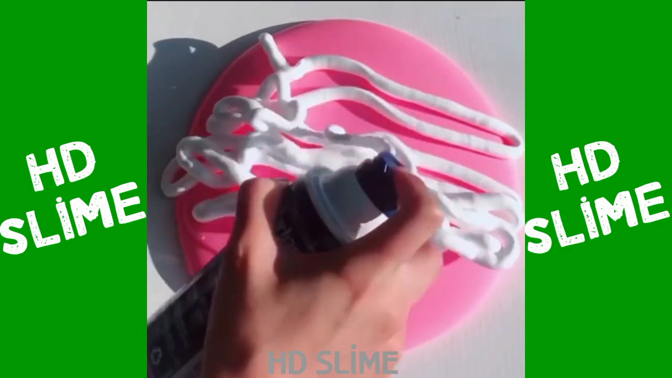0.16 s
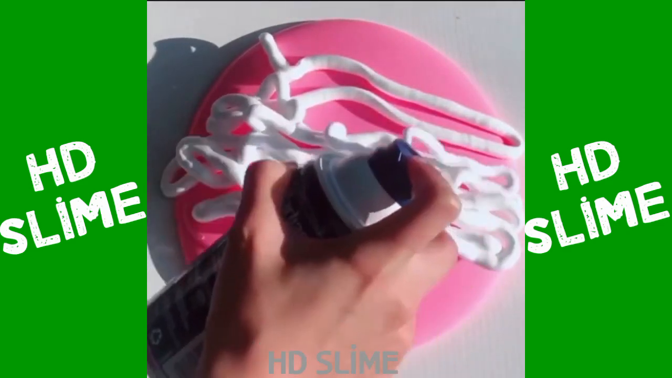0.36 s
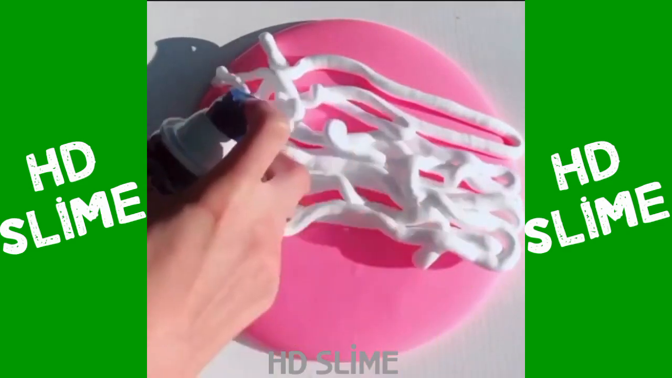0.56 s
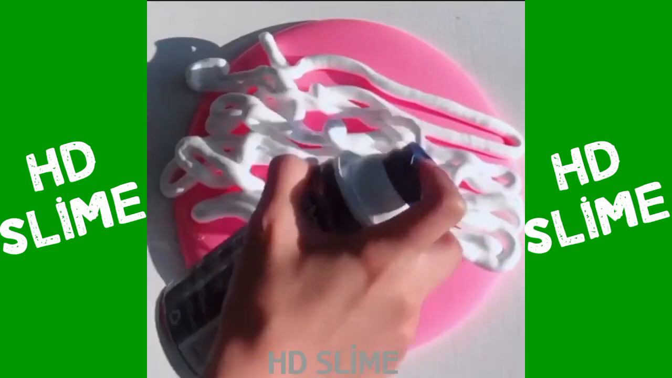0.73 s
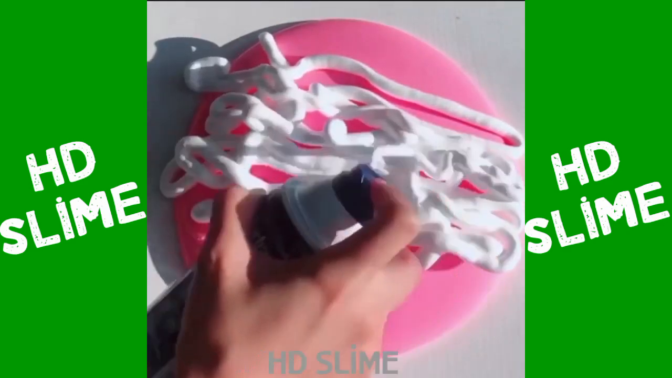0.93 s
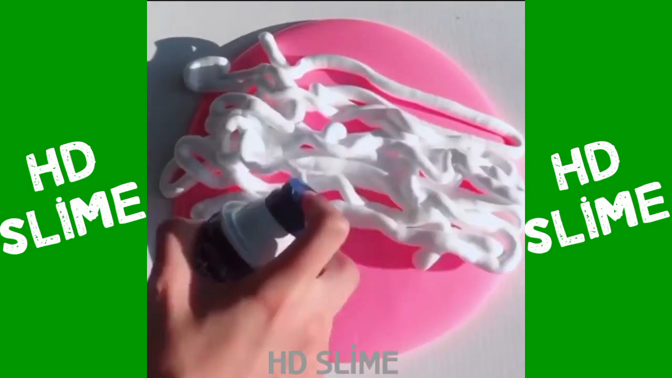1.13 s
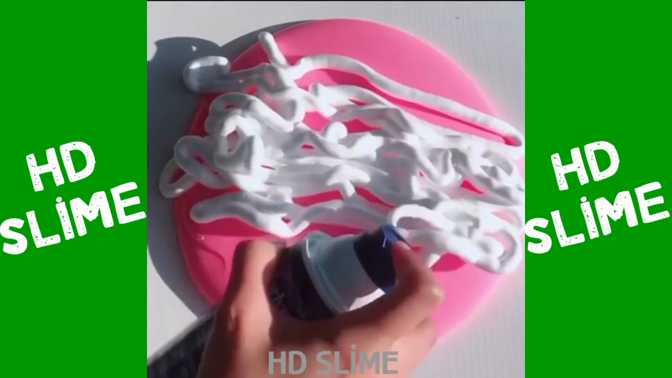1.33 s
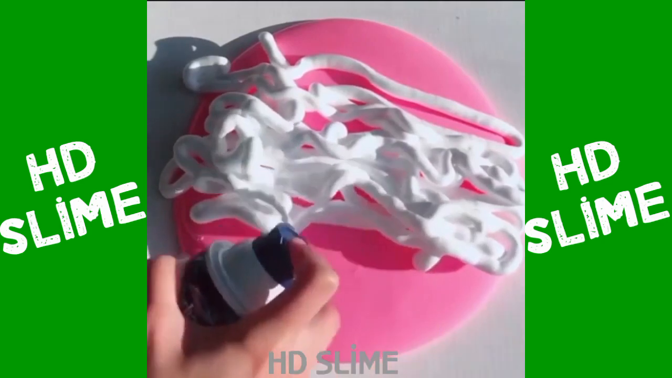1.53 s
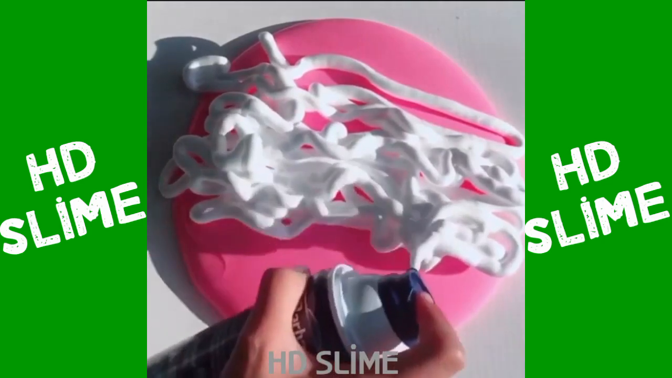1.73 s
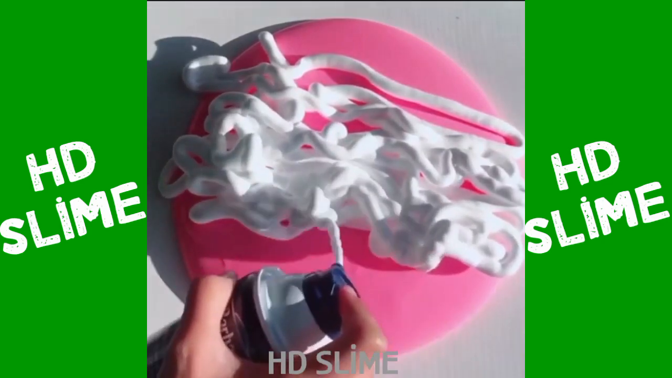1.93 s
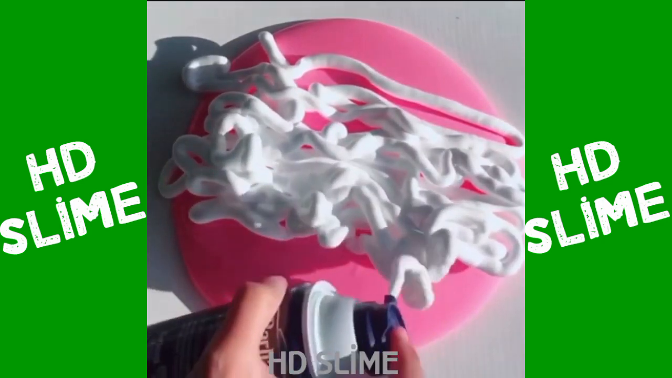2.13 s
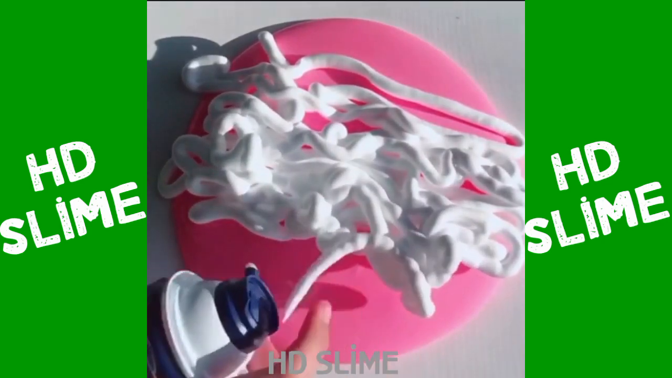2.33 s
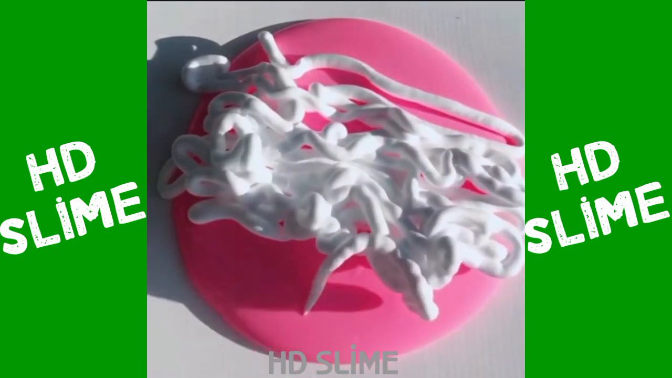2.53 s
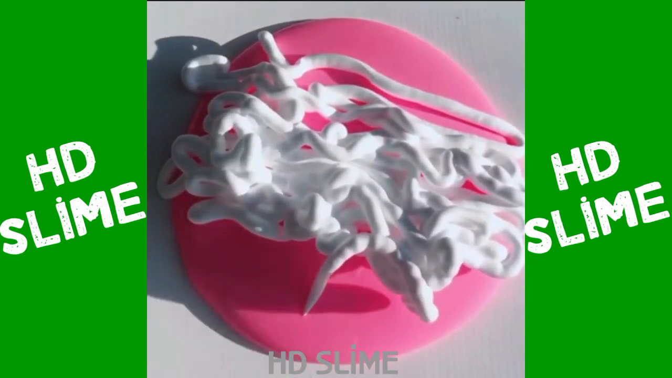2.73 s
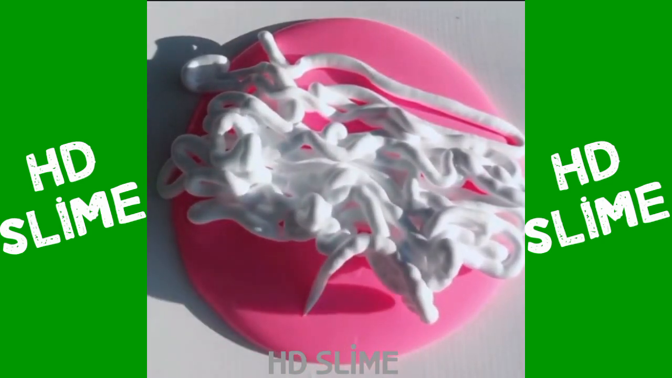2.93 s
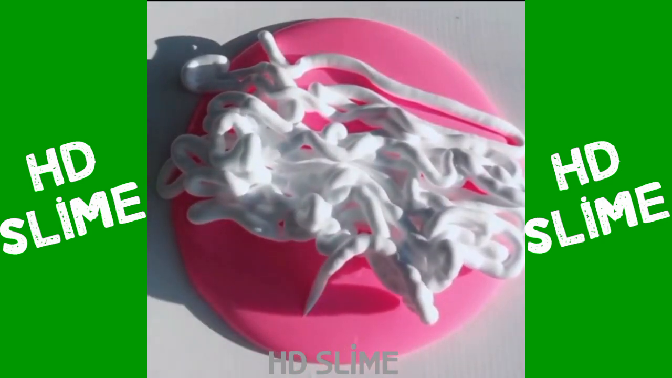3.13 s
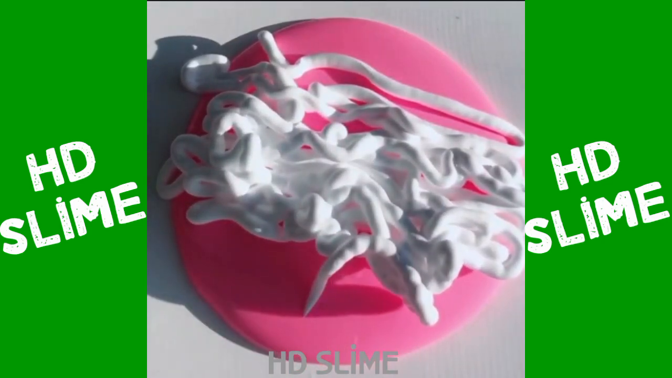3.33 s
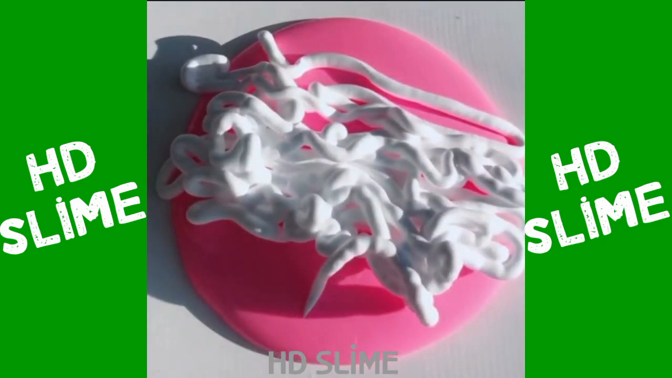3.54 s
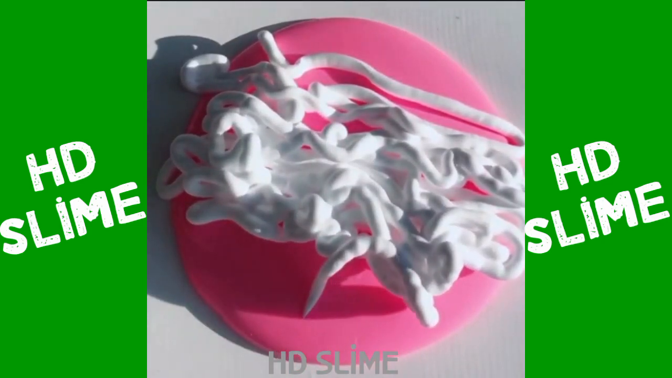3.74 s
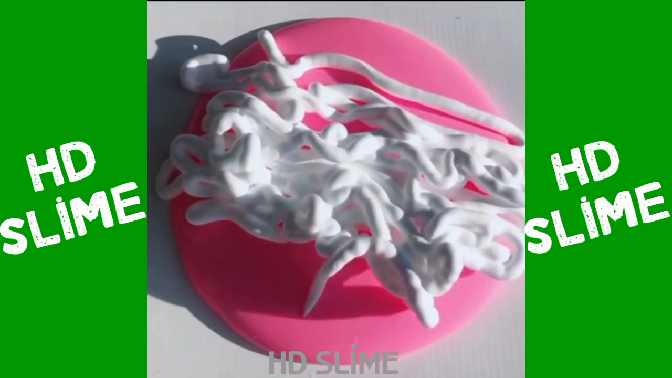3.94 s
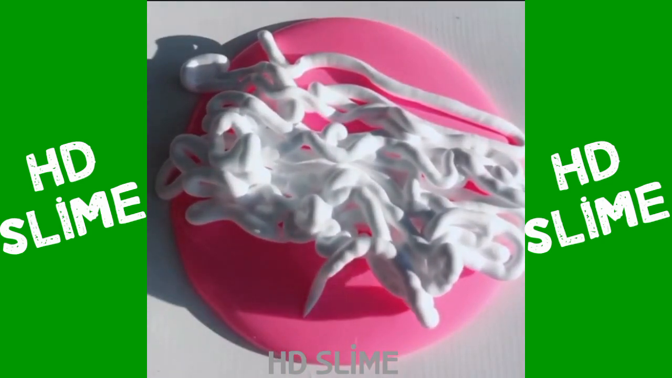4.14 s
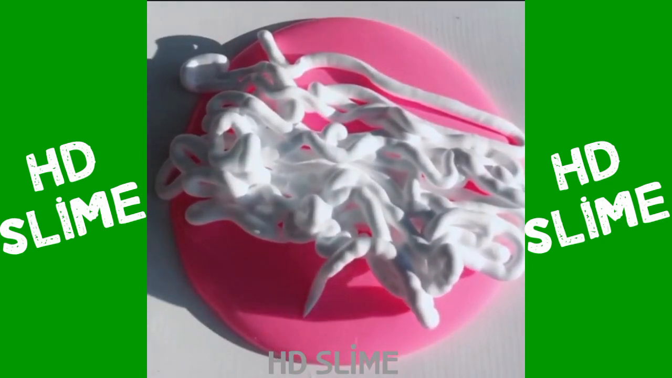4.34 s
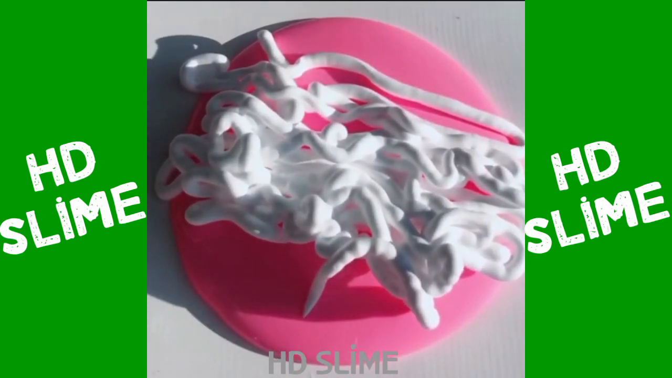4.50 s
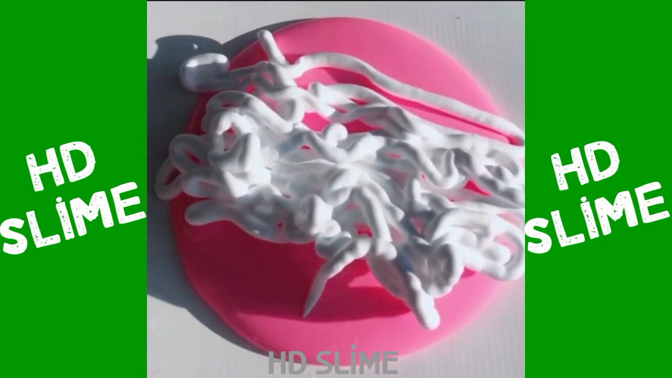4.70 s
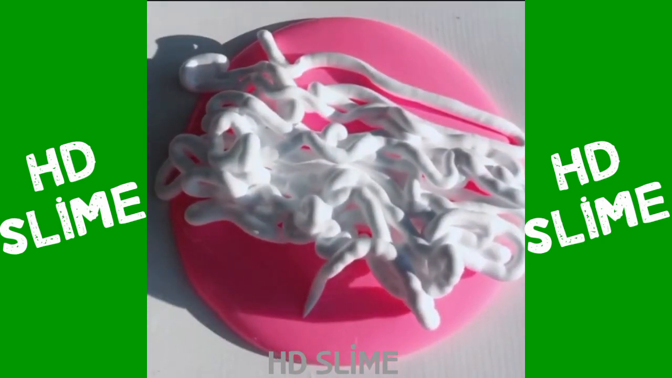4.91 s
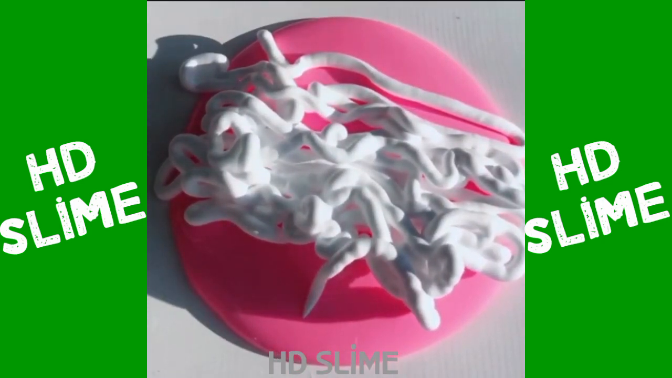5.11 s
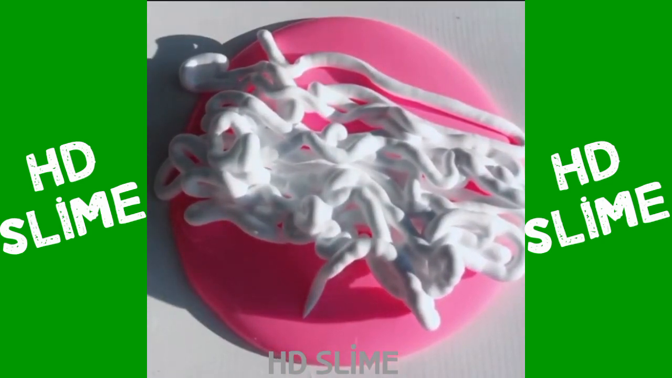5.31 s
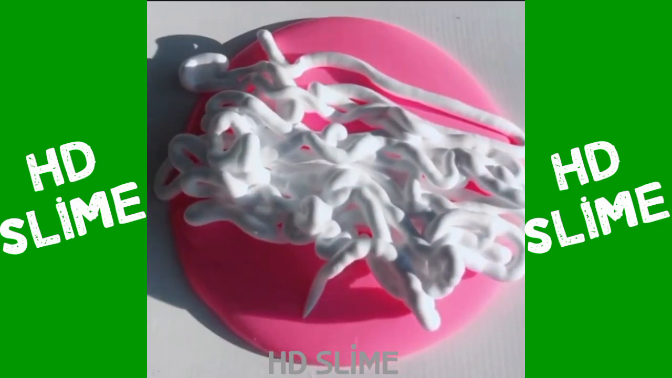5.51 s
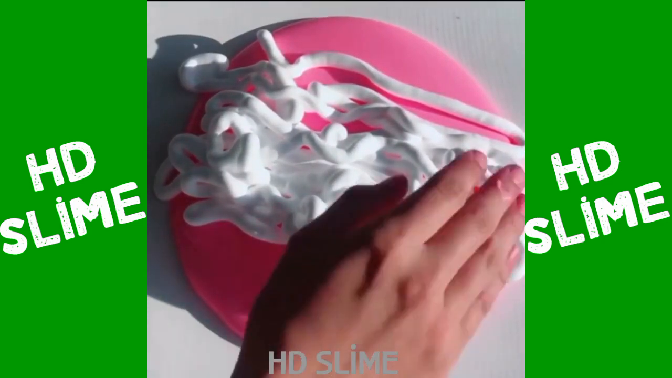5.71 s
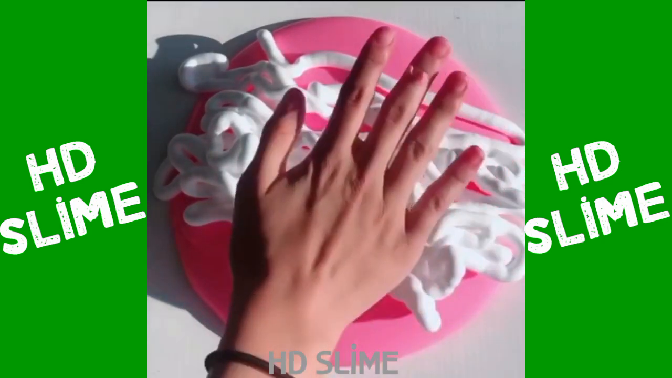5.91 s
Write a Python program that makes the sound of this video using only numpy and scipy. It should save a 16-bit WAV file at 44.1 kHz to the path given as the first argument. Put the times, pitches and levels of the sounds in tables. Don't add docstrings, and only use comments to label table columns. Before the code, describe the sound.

The sound begins mid-spray, close to the microphone: pressurised gas and foam rush from an aerosol nozzle in a bright hiss, with a breathy, unsteady whistle around 2.5 kHz and a thinner one near 4 kHz. Short sputters swell it at the start, near 0.5 s, from 1.1 to 1.7 s and just before 2.1 s, when the nozzle clogs and the higher whistle dulls. At about 2.2 s the spray stops sharply, with a tiny bleed of gas. Quiet follows: faint foam fizz and crackle, swelling slightly near 2.9 s, over soft room hiss and a slowly receding distant rumble. At 4.15 s the can knocks a wooden table, brushes it lightly, then lands at 4.43 s with the loudest low, woody thump, rim click and short dull room tail. A barely audible touch comes at 4.75 s. Fizz rises around 5.4 s, with a clear tick at 5.3 s and fainter ones until 6 s.

```python
import sys
import numpy as np
from scipy import signal
from scipy.fft import rfft, irfft, next_fast_len
from scipy.io import wavfile
from scipy.ndimage import uniform_filter1d, map_coordinates

SR = 44100
rng = np.random.default_rng(int(sys.argv[2]) if len(sys.argv) > 2 else 0)


def invert_db(x):
    u = np.asarray(x, float) / 20
    return 10 ** u


def generate_wav(signal):
    frames = np.transpose(np.atleast_2d(signal))
    scaled = np.clip(frames, -1, 1) * 32767
    pcm = np.round(scaled).astype(np.int16)
    wavfile.write(sys.argv[1], SR, pcm)


N = 262816

# [t/s, gas flow level/dB, clogging 0-1]
VALVE_CURVE = [
    (0, -47, .35),
    (.3, -48, 0.11),
    (.6, -46.5, 0.02),
    (.85, -47, 0.19),
    (1.15, -46, 0.07),
    (1.35, -47, 0.23),
    (1.58, -46.5, 0.13),
    (1.85, -46.5, .55),
    (2.0, -44.5, 0.78),
    (2.16, -46, .99),
]
# [t/s, rise level/dB]
SPURTS = [(.04, 9.5), (.09, 10), (.33, 0), (.51, 4), (1.06, 11.5), (1.2, 8.5), (1.51, 7.5), (1.57, 5),
          (1.65, 8), (1.99, 7), (2.07, 9.5), (2.135, 9.5)]
# [f/Hz, density level/dB per Hz]
JET_SPECTRUM = [(1000, -27), (1700, -14), (2540, 4.5), (2890, -11), (4150, -0.5), (4880, -7.5),
                (7050, -8.5), (7910, -12), (11200, -9), (12000, -18), (15600, -50), (22000, -120)]
# [f/Hz, width f/Hz, level/dB]
HIGH_CAVITY = [(4134, 360, 1.5), (4433, 240, -2.5), (3490, 290, -9), (3237, 750, -3)]
# [f/Hz, width f/Hz, level/dB]
HEAD = [(7130, 350, -1.5), (8800, 1150, -2.5), (11650, 480, 3.5)]
# [t/s, low modes level/dB, high modes level/dB, pitch factor under the hand's load, damping factor]
TOUCHES = [
    (4.1504, -24.5, -35.5, 1.036, 1.6),
    (4.255, -38.5, -62, 1.03, 1.5),
    (4.299, -37.5, -43, 1.03, 1.55),
    (4.314, -27.5, -72, 1.08, 1.63),
    (4.4252, -15.5, -26.5, 1.001, 0.96),
    (4.75, -40.5, -52, 0.86, 1.27),
]
# [f/Hz, level/dB, t60 t/s]
LOW_MODES = [(102.3, -7, 0.23), (126.7, -11.5, 0.26), (171.2, 12, 0.15), (206, -10, 0.32), (295, 2.5, 0.14)]
HIGH_MODES = [(350, 11, 0.048), (457, -26, .07), (599, -3.5, 0.078), (840, -23, 0.025), (815, 4, 0.024),
              (1158, -11, 0.042), (1370, -7, 0.033), (1460, -21, 0.034), (2040, -13, 0.011),
              (2410, -20, .02)]
# [t/s, peak level/dB]
TICKS = [
    (5.2838, -40),
    (5.303, -56),
    (4.689, -50),
    (5.918, -50),
    (5.715, -53),
    (3.36, -54),
]
# [t/s, rise level/dB]
SWELLS = [
    (2.2, 3),
    (2.9, 5.5),
    (4.62, 0.5),
    (5.41, 7.5),
]
# [f/Hz, density level/dB per Hz]
RUMBLE_SPECTRUM = [(15, -52), (25, -8.5), (39, -11), (64, -1), (98, -11.5), (119, -5.5), (188, -15.5),
                   (260, -19.5), (340, -55), (570, -120)]
# [f/Hz, width f/Hz, level/dB]
DRONES = [(56, 23.5, -56.5), (75.6, 12, -51)]
# [f/Hz, density level/dB per Hz]
HISS_SPECTRUM = [(130, -45), (220, -13.5), (273, -3.5), (334, -1.5), (452, -10.5), (734, -7), (943, -10.5),
                 (1120, -10.5), (1610, -15.5), (4110, -18.5), (4860, -20.5), (11400, -29.5), (12000, -49),
                 (15600, -63), (22000, -120)]

SHUT_S = 2.163


def spray():
    flow_db, low_db, high_db, low_hz = nozzle()
    t = np.minimum(np.arange(N) / SR, SHUT_S)

    jet = coloured(JET_SPECTRUM, patchy_db=2.5, rate=11, octaves=.06)
    ringing = 0
    for hz, width_hz, db in HEAD:
        flicker = invert_db(300 / width_hz * 2.7 * drift(3.1))
        ringing = ringing + invert_db(db) * resonance(jet, hz, width_hz) * flicker
    jet = jet + ringing

    body = whistle(low_hz + 30, 500) * invert_db(2.3 * drift(18))
    shoulder = invert_db(-8.5 + 2.5 * t) * whistle(2120, 140) * invert_db(2.1 * drift(4.0))
    core = invert_db(-2) * whistle(low_hz + 45 * drift(7), 93) * invert_db(1.5 * drift(26))
    low = filtered(body + shoulder + core, 6, 1960, "high")

    high = 0
    for hz, width_hz, db in HIGH_CAVITY:
        sagging_hz = hz * (1.025 - .025 * t) + 70 * drift(4.4)
        high = high + invert_db(db + 2.7 * drift(25)) * whistle(sagging_hz, width_hz)
    return invert_db(flow_db + 3.5) * rms_one(jet) + invert_db(low_db - 2.0) * rms_one(low) + invert_db(high_db + 1.0) * rms_one(high)


def nozzle():
    flow_db, clog = in_time(VALVE_CURVE)
    since_shut = np.maximum(np.arange(N) / SR - SHUT_S, 0)
    spurt_db = bumps(SPURTS, rise_s=0.021, fall_s=0.027)
    low_db = flow_db + 1.04 + 0.5 * clog + spurt_db - 450 * since_shut
    leak_db = -15 - 300 * since_shut
    flow_db = flow_db + np.maximum(-1002 * since_shut, leak_db)
    high_db = flow_db + 3 - 21 * clog
    low_hz = 2534 - 120 * clog + 8.5 * spurt_db
    return flow_db, low_db, high_db, low_hz


def thumps(travel=0.0744, low_build_s=0.022, high_build_s=0.0025):
    out, t = np.zeros(N), np.arange(SR // 2) / SR
    main_hz = LOW_MODES[2][0]
    for s, low_db, high_db, pitch, damping in TOUCHES:
        side_db = -0.4 * max(low_db - high_db - 11.5, 0)
        at = round(s * SR)
        for modes, level_db, build_s in (LOW_MODES, low_db, low_build_s), (HIGH_MODES, high_db, high_build_s):
            for k, (hz, db, t60) in enumerate(modes):
                late = np.maximum(t - travel / np.sqrt(hz) + 0.00231, 0)
                swell = 1 - np.exp(-late / build_s)
                spot_db = side_db * (hz < 800 and hz != main_hz)
                wave = swell * np.sin(2 * np.pi * hz * pitch * late) * (-1) ** k
                out[at:at + len(t)] += invert_db(level_db + db + spot_db - 60 * damping * late / t60) * wave
    return out


def cracks():
    t60, swell_s = .03, .002
    t, envelope, clicks = np.arange(SR // 8) / SR, np.zeros(N), np.zeros(N)
    for s, low_db, high_db, *_ in TOUCHES:
        at = round(s * SR)
        swell = 1 - np.exp(-(t / swell_s) ** 2)
        envelope[at:at + len(t)] += invert_db(high_db - 4 - 60 * t / t60) * swell
        clicks[round((s + swell_s) * SR)] = invert_db(high_db + 24)
    return filtered(clicks + envelope * 4 * rng.standard_normal(N), 4, (750, 1700), "band")


def echo_tail():
    t60, swell_s, below_db = .45, .015, 15
    t, envelope = np.arange(SR // 2) / SR, np.zeros(N)
    for s, low_db, high_db, pitch, damping in TOUCHES:
        at = round(s * SR)
        decay = invert_db(high_db - below_db - 60 * damping ** 2 * t / t60)
        envelope[at:at + len(t)] += decay * (1 - np.exp(-t / swell_s))
    dull = filtered(rng.standard_normal(N), 2, [290, 1300], "band")
    return envelope * invert_db(3.0 * drift(30)) * rms_one(dull)


def foam():
    fizz_db = -69 + bumps(SWELLS, rise_s=0.27, fall_s=0.27)
    burst = np.zeros(N)
    for s, db in TICKS:
        burst[round(s * SR)] = invert_db(db)
    born = rng.random(N) < 40 * invert_db(5 * drift(4)) / SR
    burst += born * invert_db(fizz_db + 4.0 + 3.2 * np.minimum(rng.exponential(1, N), 3))

    r = np.exp(-1 / (.0005 * SR))
    puffs = signal.lfilter([1], [1, -r], burst + 1e-18) * rng.standard_normal(N)
    puffs = filtered(puffs, 5, 3500, "high")
    pop = invert_db(0.5) * resonance(np.roll(burst, round(.0009 * SR)) * 10, 3900, 700)
    fizz = filtered(rng.standard_normal(N), 2, 7500, "high")
    fizz = invert_db(fizz_db + 3.5 + 3.2 * drift(5.4)) * fizz
    return pop + puffs + 1.1 * resonance(puffs, 10000, 3100) + fizz


def distant_rumble():
    level_db = -48 - 0.53 * (np.arange(N) - N / 2) / SR
    rumble = invert_db(level_db) * coloured(RUMBLE_SPECTRUM, patchy_db=1.5, rate=4.8, octaves=0.575)
    drones = sum(invert_db(db) * whistle(hz, width_hz) for hz, width_hz, db in DRONES)
    return filtered(rumble + drones, 4, 35, "high")


def room_hiss():
    level_db = -53 + 1.26 * (np.arange(N) < SHUT_S * SR)
    hiss = coloured(HISS_SPECTRUM, patchy_db=2.5, rate=12, octaves=.07)
    return invert_db(level_db) * filtered(hiss, 1, 9000, "low")


def rms_one(x):
    return x / np.sqrt(np.mean(x ** 2) + 1e-20)


def filtered(x, order, hz, kind):
    return signal.sosfilt(signal.butter(order, hz, kind, fs=SR, output="sos"), x)


def in_time(rows):
    s, *columns = np.transpose(rows)
    return [np.interp(np.arange(N) / SR, s, c) for c in columns]


def bumps(rows, rise_s, fall_s):
    t = np.arange(N) / SR
    return sum(db * np.clip(np.minimum(1 + (t - s) / rise_s, 1 - (t - s) / fall_s), 0, 1) for s, db in rows)


def drift(rate):
    r = np.exp(-80 * np.pi * rate / SR)
    slow = signal.lfilter([1], [1, -2 * r, r * r], rng.standard_normal(N // 40 + 2002))[2000:]
    return np.interp(np.arange(N) / 40, np.arange(len(slow)), rms_one(slow))


def coloured(spectrum, patchy_db, rate, octaves):
    hz, level = np.transpose(spectrum)
    size = next_fast_len(N)
    bins = np.log2(np.maximum(np.arange(size // 2 + 1) * SR / size, 1))
    gain = invert_db(np.interp(bins, np.log2(hz), level))
    shaped = irfft(rfft(rng.standard_normal(size)) * gain, size)[:N]

    f, t, cells = signal.stft(shaped, SR, nperseg=1024)
    coarse = rng.standard_normal((250, 400))
    pitch_steps = np.log2(np.maximum(f, 40) / 40) / octaves
    across, along = np.meshgrid(pitch_steps, t * rate * 2, indexing="ij")
    patches = map_coordinates(coarse, [across, along], order=1)
    together = np.interp(t * rate, np.arange(400), coarse[-1])
    flicker = invert_db(patchy_db * (patches + 0.27 * together))
    return rms_one(signal.istft(cells * flicker, SR)[1][:N])


def resonance(x, hz, width_hz):
    r = np.exp(-np.pi * width_hz / SR)
    zeros = np.array([1, 0, -1]) * (1 - r * r) / 2
    return signal.lfilter(zeros, [1, -2 * r * np.cos(2 * np.pi * hz / SR), r * r], x)


def whistle(hz, width_hz):
    r = np.exp(-np.pi * width_hz / SR)
    noise = rng.standard_normal(N) + 1j * rng.standard_normal(N)
    slow = signal.lfilter([1], [1, -2 * r, r * r], noise)
    carrier = np.exp(2j * np.pi * np.cumsum(hz * np.ones(N)) / SR)
    return rms_one(np.real(slow * carrier))


def scene():
    can = spray() + thumps() + cracks() + echo_tail() + foam()
    mono = can + distant_rumble() + room_hiss()
    return np.array([mono, mono])


def roll_off(x):
    return signal.sosfilt(signal.butter(12, 13140, fs=SR, output="sos"), x)


def record(dry):
    top = 0.27
    f, t, cells = signal.stft(top * np.tanh(dry[0] / top), SR, nperseg=2048)
    wander = uniform_filter1d(rng.standard_normal(len(t)), size=2) * 1.4
    edge_hz = 11900 + 130 * np.clip(wander, -2, 2.4)
    cells = cells * (f[:, None] < edge_hz)

    low_hz = rng.uniform(4200, 9400, len(t))
    chosen = rng.random(len(t)) < .03 + .09 * (t > 2.3)
    filled = chosen * (f[:, None] > low_hz) * (f[:, None] < 1.25 * low_hz)
    side = invert_db(-2.0) * filled * cells * np.exp(2j * np.pi * rng.random(cells.shape))
    mid, side = signal.istft(np.array([cells, side]), SR)[1][:, :N]
    return roll_off(np.array([mid + side, mid - side]))


dry = scene()
out = record(dry)
generate_wav(out)
```